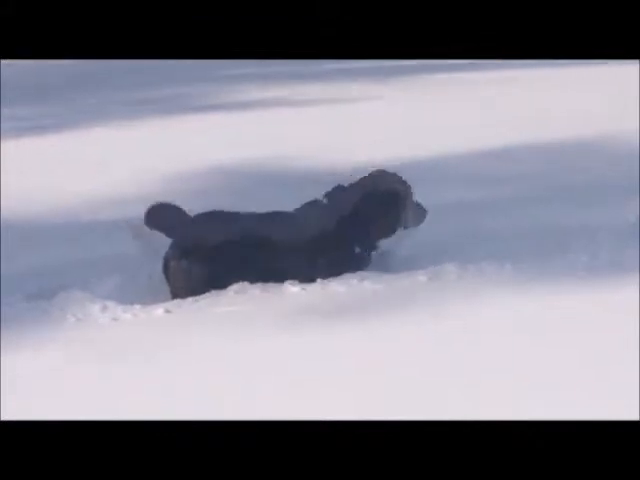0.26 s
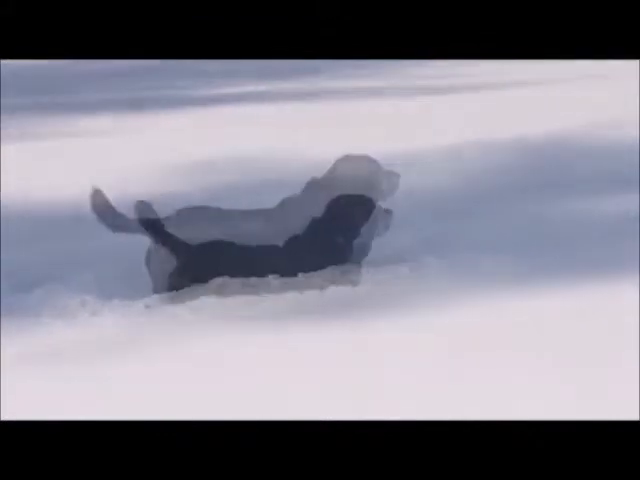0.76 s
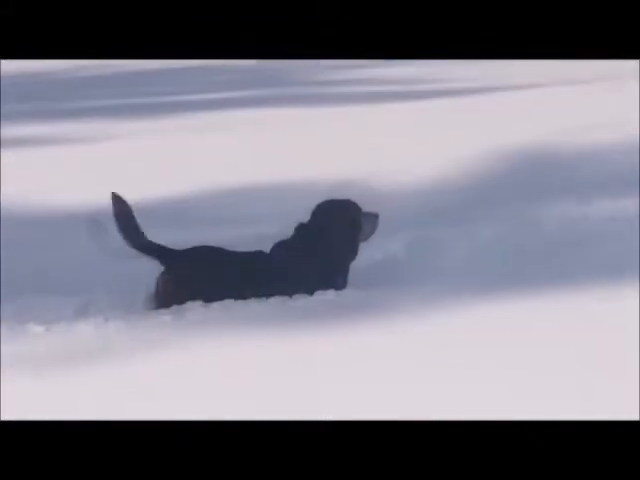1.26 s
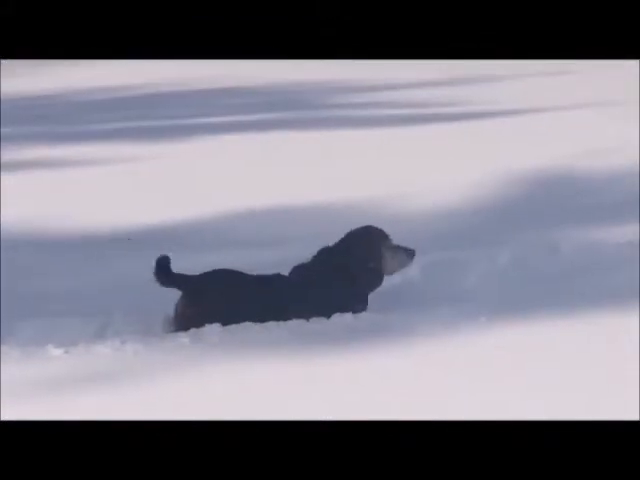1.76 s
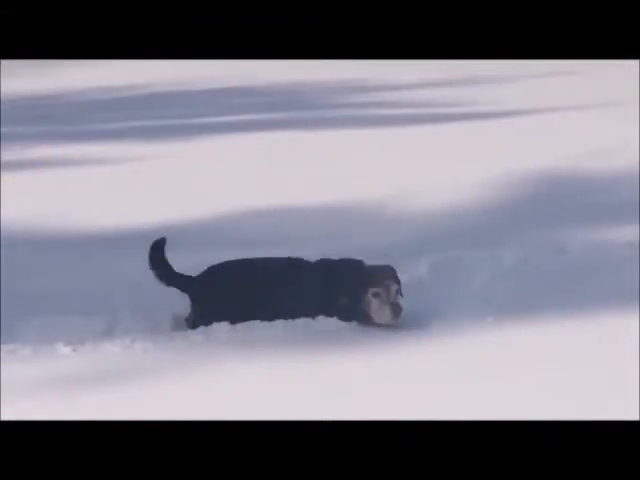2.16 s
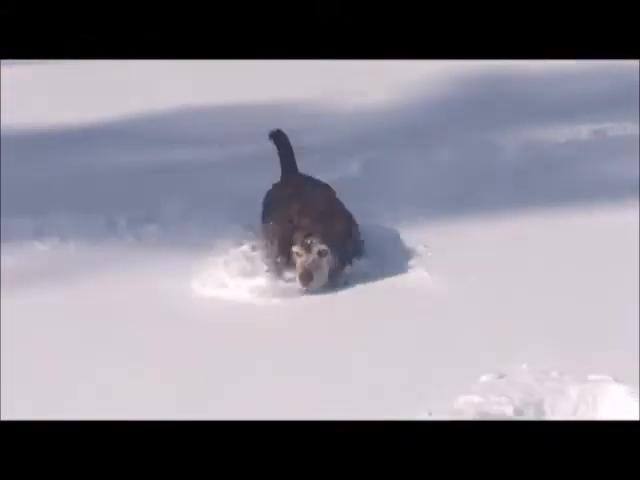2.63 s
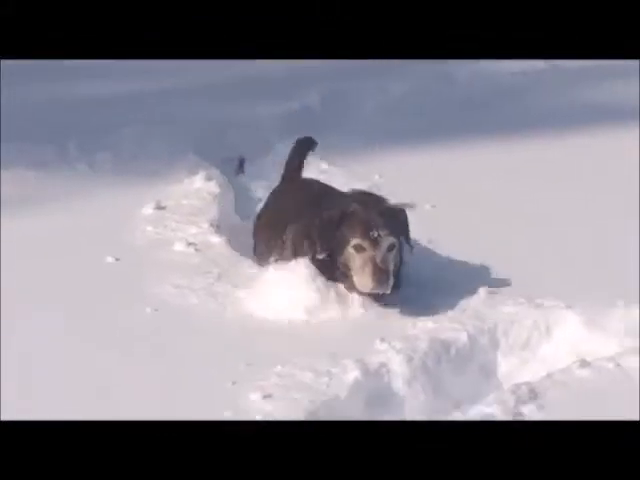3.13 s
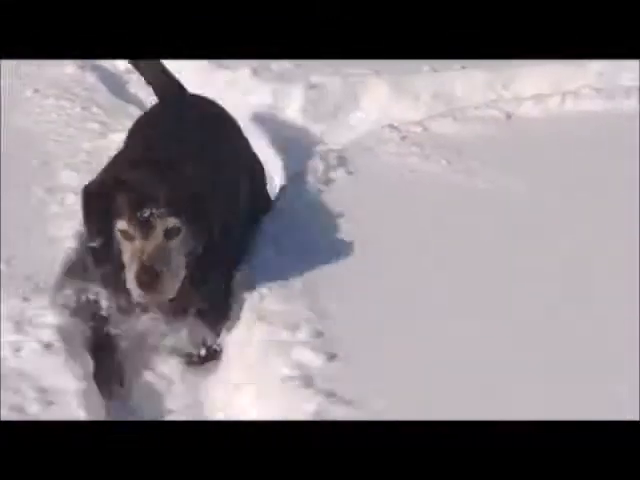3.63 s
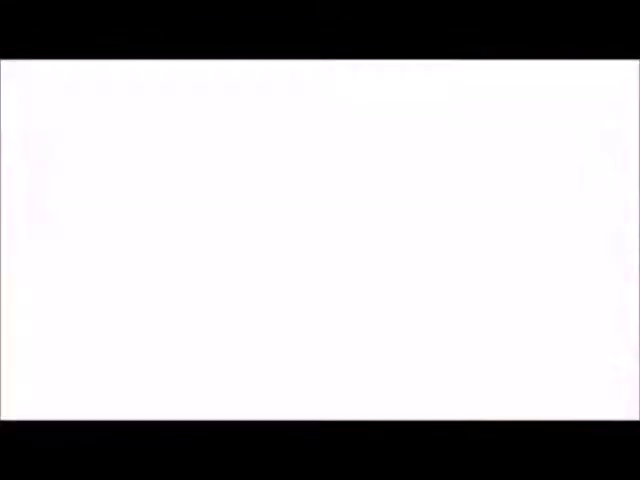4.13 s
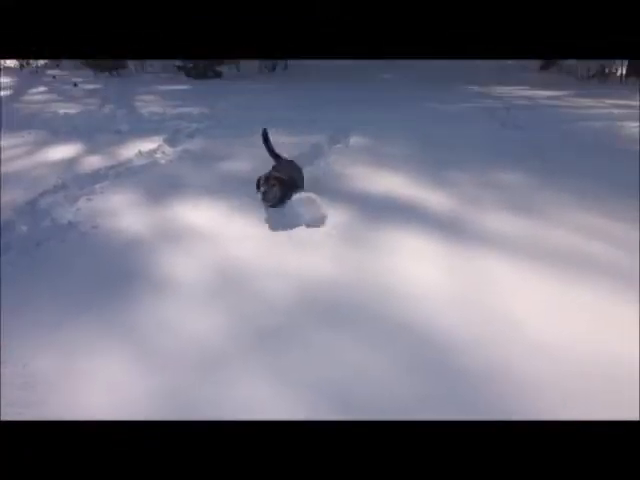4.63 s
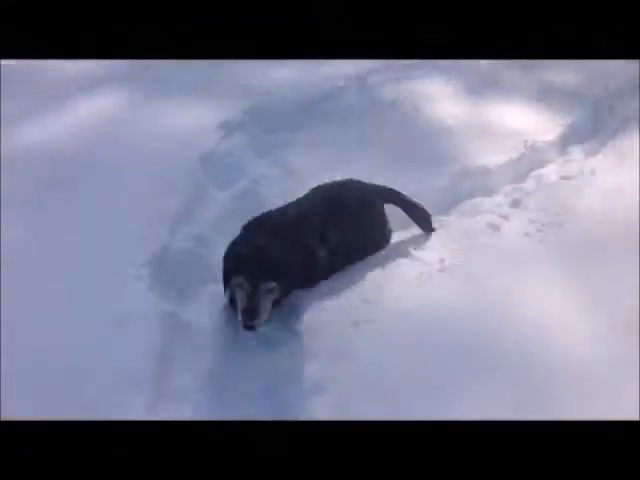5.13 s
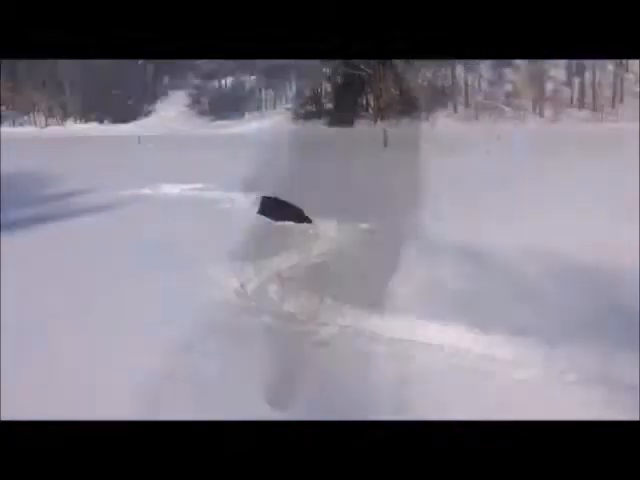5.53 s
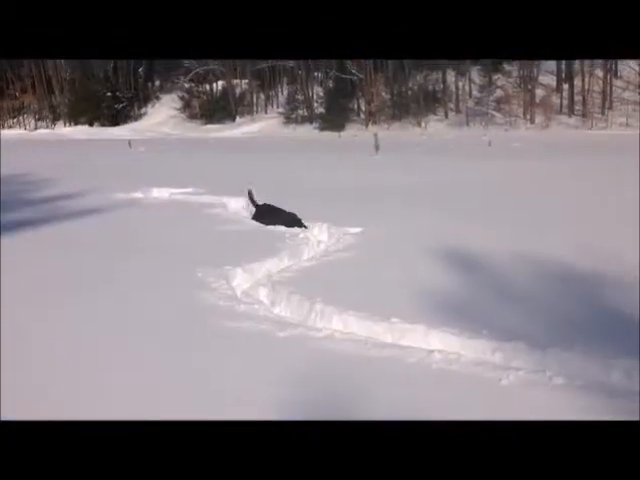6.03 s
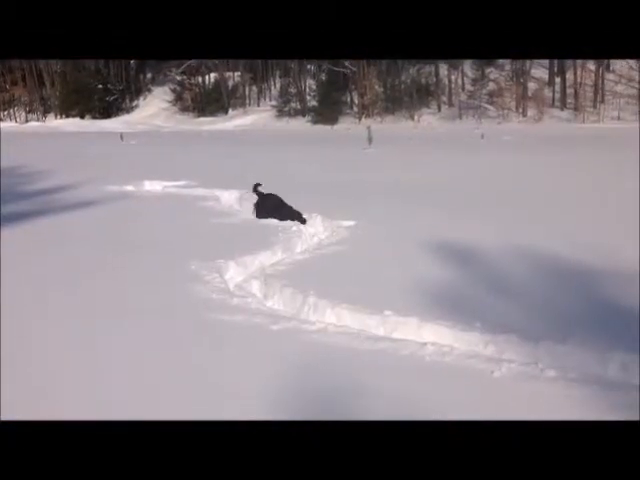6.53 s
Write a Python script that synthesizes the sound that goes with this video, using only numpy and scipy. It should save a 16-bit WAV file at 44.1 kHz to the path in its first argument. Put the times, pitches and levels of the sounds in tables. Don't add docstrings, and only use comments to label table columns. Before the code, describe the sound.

An open snowy field, dry and without echo, heard through a small hand-held camera microphone with low air rumble, steady hiss and a faint high buzz. At 0.25-0.4 s a paw crunches and squeaks in the crust with a sharp snap. Collar tags jingle lightly near 0.1 and 0.65 s, while a small bird gives faint falling chips from 0.5 to 1.06 s. Soft thuds and tiny ticks follow; the tags rattle again at 2.55-2.8 s. At 3.45-3.65 s the dog breaks hard through the crust, bright and crisp, then trickling. A very loud button click strikes at 4.10 s with a small release, then a near-silent gap until 4.25 s. Lighter crunches, knocks and thuds continue, with clicks at 5.06 and 5.64 s. From 5.7 s to about 6.8 s it is calm, with a faint, wavering, slowly rising machine whine far away.

```python
import sys
import numpy as np
from scipy import signal
from scipy.fft import rfft, irfft
from scipy.io import wavfile
from scipy.ndimage import uniform_filter1d

SR = 44100
rng = np.random.default_rng(int(sys.argv[2]) if len(sys.argv) > 2 else 0)


def magnitude_from_level(level_db):
    exponent = np.asarray(level_db, float) / 20
    return 10 ** exponent


def wav_out(sig):
    wavfile.write(sys.argv[1], SR, np.round(np.clip(np.atleast_2d(sig).T, -1, 1) * 32767).astype(np.int16))


N = 299424


def colour(x, points):
    hz, db = np.transpose(points)
    grid = np.linspace(1, SR / 2, 2049)
    cepstrum = irfft(np.interp(np.log(grid), np.log(hz), db) * np.log(10) / 20)
    cepstrum[1:2048] *= 2
    cepstrum[2049:] = 0
    response = irfft(np.exp(rfft(cepstrum)))[:2048]
    return signal.fftconvolve(x, response)[:N]


def unit(x):
    return x / np.sqrt(np.mean(x ** 2))


def band(x, hz, width):
    return signal.lfilter(*signal.iirpeak(hz, hz / width, fs=SR), x)


def walk(rate):
    hold = int(SR / rate)
    steps = np.repeat(rng.standard_normal(N // hold + 1), hold)
    return 1.3 * uniform_filter1d(uniform_filter1d(steps, hold), hold)[:N]


def add(out, s, piece):
    i = int(s * SR)
    out[i:i + len(piece)] += piece[:N - i]


def fade(rise, t60, seconds):
    t = np.arange(int(seconds * SR)) / SR
    return (1 - np.exp(-t / rise)) * magnitude_from_level(-60 * t / t60)


def grains(per_second, scatter_db):
    chance = rng.random((3, N))
    size = magnitude_from_level(-scatter_db * np.log(chance[1] + 1e-4)) * np.sign(chance[2] - .5)
    return (chance[0] < per_second / SR) * size


# frequency in Hz, level in dB per Hz.
SNOW = [(120, -61), (200, -25), (236, -16), (305, -6), (499, -22.5), (621, -13.5), (693, -9), (1580, -12),
        (3160, -1), (4730, -10.5), (7890, -27.5), (15800, -40)]


def crushed_snow():
    return unit(colour(grains(6500, 2.1) * magnitude_from_level(1.8 * walk(250)), SNOW))


# start in seconds, level in dB, length in seconds, brightness in dB per octave.
BREAKS = [(0.261, -50.5, 0.01, -4), (0.27, -41, 0.016, 3), (0.28, -49.5, 0.016, 1),
          (0.328, -49.5, 0.034, 5), (2.152, -56.5, 0.02, -2), (2.248, -69, 0.057, 8),
          (3.4555, -35, 0.0032, 10.5), (3.473, -38, 0.041, 3), (3.459, -36.5, 0.019, 4),
          (3.511, -42.5, 0.032, 4), (3.595, -37, 0.043, 4.5), (3.649, -51.5, 0.019, 2),
          (3.662, -60.5, 0.034, -5.5), (4.055, -58, 0.018, -2), (4.13, -48.5, 0.01, -1),
          (4.229, -46, 0.023, 5.5), (4.584, -62.5, 0.059, -2), (4.858, -65, 0.062, -5.5),
          (5.208, -64, 0.027, -1)]
# start in seconds, level in dB, length in seconds, brightness in dB per octave.
SINKS = [(0.236, -54, 0.041, 2.5), (0.286, -48.5, 0.051, 5.5), (0.352, -47, 0.021, 2.5),
         (1.38, -67.5, 0.069, -1), (3.419, -59, 0.035, -4), (3.444, -40.5, 0.014, -2),
         (3.535, -44.5, 0.024, 3.5), (3.567, -48, 0.035, 1.5), (3.629, -42.5, 0.02, 4),
         (3.731, -52.5, 0.03, 0), (3.867, -57, 0.018, 1), (4.361, -62, 0.028, 6.5),
         (4.491, -57.5, 0.019, 4), (4.705, -61.5, 0.02, 6), (4.84, -56, 0.029, 7.5),
         (4.923, -60, 0.017, -3), (4.954, -59.5, 0.056, 3.5), (5.333, -62, 0.061, 2),
         (5.578, -55.5, 0.045, 0), (6.203, -79.5, 0.17, 18.5)]
BREAK_PEAK, SINK_PEAK = 0.16, 0.55


def crunch(snow):
    out = np.zeros(N)
    for steps, peak in ((BREAKS, BREAK_PEAK), (SINKS, SINK_PEAK)):
        for s, db, length, tilt_db in steps:
            u = np.arange(int(length * SR)) / (length * SR)
            shape = np.sin(np.pi * u ** (np.log(.5) / np.log(peak))) ** .8
            burst = unit(snow[int(s * SR):][:len(u)]) * shape
            piece = np.r_[burst, np.zeros(200)]
            tilt = [(200, -3.9 * tilt_db), (3000, 0), (6000, tilt_db), (16000, 1.5 * tilt_db)]
            add(out, s, magnitude_from_level(db) * colour(piece, tilt)[:len(piece)])
    return out


# start in seconds, level in dB, length in seconds, centre in Hz.
SQUEAKS = [(0.262, -50, .008, 3610), (.2705, -44.5, 0.008, 2850), (0.279, -47, 0.013, 3230),
           (0.327, -50, 0.021, 3080), (.33, -55, .018, 4700), (0.675, -50, 0.015, 2970),
           (2.23, -72, .07, 6660), (2.564, -58, 0.016, 2950), (2.692, -54, 0.018, 2873),
           (3.197, -73, 0.16, 7050), (3.4755, -38, 0.009, 3300), (3.47, -66, .03, 14500),
           (3.535, -70, .022, 14800), (3.595, -48, .026, 5200), (3.605, -48, .025, 4130),
           (3.512, -43, 0.012, 3250), (3.54, -45, .008, 3050), (3.594, -37.5, 0.015, 3130),
           (3.632, -46, 0.014, 3040), (4.106, -47.5, .006, 8170), (4.1035, -46, .003, 10000),
           (3.596, -66, .028, 14800), (5.062, -53, .014, 7000), (5.065, -49, .008, 3200),
           (4.985, -65, .02, 4600), (4.128, -48, 0.0066, 2750), (4.245, -58, 0.015, 4150),
           (4.84, -53, .023, 3860), (4.975, -79, .028, 3550), (5.21, -64, 0.011, 3640),
           (5.59, -58, .024, 4820), (5.595, -67, 0.019, 3230)]


def squeak(snow):
    out = np.zeros(N)
    lead = 400
    for s, db, length, hz in SQUEAKS:
        width = 0.14 * hz
        piece = snow[int(s * SR) - lead:][:lead + int(length * SR)]
        ring = band(band(piece, hz, width), hz, 2 * width)[lead:]
        swell = np.sin(np.pi * np.arange(len(ring)) / len(ring)) ** 1.1
        add(out, s, magnitude_from_level(db) * unit(ring) * swell)
    return out


# time in seconds, peak in dB, centre in Hz.
TICKS = [(0.3845, -21, 3030), (0.617, -39, 2710), (1.3803, -49, 2830), (1.4935, -44, 4700),
         (1.4935, -50, 2400), (1.4935, -49, 7500), (2.2675, -53, 2900), (.617, -45, 6300),
         (.617, -47, 4500), (.617, -49, 1300), (.2588, -40, 3300), (.2742, -33, 2800), (.3306, -39, 3070),
         (.3576, -39, 4500), (.3616, -41, 2850), (4.8477, -44, 3750), (1.664, -55, 7000),
         (1.664, -56, 2200), (3.702, -50, 2900), (3.727, -50, 3200), (3.847, -51, 2900),
         (3.5137, -36, 3270), (5.3945, -51, 2860), (5.5347, -52, 6000), (5.2458, -53, 2970),
         (5.2089, -48, 3700), (4.9277, -38, 3000), (5.0232, -48, 2600), (5.2455, -52, 6000),
         (5.417, -50, 3800), (3.5815, -46, 2900), (3.5974, -27, 3100), (3.5974, -34, 5600),
         (3.4772, -29, 3400), (3.5396, -37, 3040), (5.3945, -48, 6000), (1.6374, -56, 3370),
         (1.8694, -55, 2510), (1.9644, -56, 3670), (2.1465, -40, 3010), (5.1055, -50, 6000),
         (2.6965, -48, 2900), (1.928, -57, 3600), (.6503, -50, 3400), (2.2059, -52, 2810),
         (3.1892, -50, 3130), (3.2111, -46, 3290), (3.269, -44, 3260), (3.4186, -44, 2930),
         (3.4456, -22, 2920), (3.4535, -19, 3110), (3.4584, -24, 3430), (3.7683, -32, 3300),
         (3.8427, -50, 2790), (3.8696, -48, 2900), (3.91, -46, 3190), (3.9584, -48, 2870),
         (4.0068, -33, 3150), (4.4109, -50, 3040), (4.5895, -46, 3130), (5.4914, -44, 3020),
         (5.5653, -42, 2680)]
# time in seconds, peak in dB, centre in Hz.
KNOCKS = [(0.91, -45, 404), (1.963, -47.5, 736), (2.146, -47, 732), (2.205, -43.5, 570),
          (2.795, -50.5, 374), (2.857, -50, 423), (2.938, -52.5, 703), (3.19, -47, 1100),
          (3.269, -48.5, 800), (3.211, -44, 348), (3.445, -33, 775), (3.4531, -24.5, 580),
          (3.458, -33, 1150), (3.727, -50, 500), (4.0067, -39.5, 895), (1.664, -51.5, 600),
          (2.035, -52, 400), (2.269, -52, 500), (5.466, -48, 520), (5.576, -48, 800), (4.271, -41.5, 555),
          (4.415, -42.5, 611), (4.451, -44.5, 353), (4.468, -55, 366), (4.592, -48, 421),
          (4.67, -44.5, 690), (4.694, -44.5, 412), (4.853, -45, 1200), (4.879, -41.5, 600),
          (4.915, -41, 1000), (4.92, -38, 580), (4.924, -41, 800), (4.9273, -53, 900), (4.982, -49, 900),
          (5.001, -41, 895), (5.006, -41, 500), (5.015, -45, 1200), (5.074, -37, 1400), (5.023, -38.5, 759),
          (5.031, -33.5, 377), (5.106, -35, 1210), (5.1945, -47, 544), (5.204, -45, 1500),
          (5.406, -41.5, 536), (5.445, -50, 700), (5.537, -38.5, 519)]


def snaps():
    out, click = np.zeros(N), np.r_[1., np.zeros(1500)]
    soft = signal.lfilter(*signal.butter(6, 6800, fs=SR), click)
    for s, db, hz in TICKS:
        snap = band(band(soft, hz, 0.15 * hz) + 0.12 * soft, hz, 1.7 * hz)
        add(out, s + 0.0009, magnitude_from_level(db - 3.5) * snap / snap.max())
    for s, db, hz in KNOCKS:
        knock = band(band(soft, hz, 0.95 * hz), hz, 1.8 * hz)
        add(out, s + 0.001036, magnitude_from_level(db - 1.0) * knock / knock.max())
    return out


# time in seconds, peak in dB, centre in Hz.
THUDS = [(.103, -43, 310), (.313, -39.5, 295), (.536, -44, 363), (.628, -41, 227), (0.735, -41.5, 252),
         (.908, -42.5, 302), (1.0, -44.5, 207), (1.429, -42, 217), (2.514, -49.5, 236.7),
         (2.855, -40.5, 300), (3.174, -33.5, 430), (3.206, -43, 347), (3.268, -42.5, 284),
         (3.372, -42, 283), (3.45, -32.5, 252), (4.412, -39.5, 547), (4.571, -45, 393), (4.667, -40.5, 258),
         (4.916, -38, 585), (5.028, -43, 240), (5.074, -31, 242), (5.128, -48, 330), (5.159, -47.5, 462),
         (5.46, -43, 546), (5.517, -40, 470), (5.538, -48, 401), (5.647, -31, 510), (5.668, -45, 204),
         (6.253, -48.5, 317)]


def thuds():
    out = np.zeros(N)
    length = 4000
    for s, db, hz in THUDS:
        t60 = 0.046 * (300 / hz) ** 0.32
        puff = unit(band(rng.standard_normal(length), hz, 0.374 * hz))
        puff = puff * fade(0.0024, t60, length / SR)
        add(out, s, magnitude_from_level(db - 3.0) * band(puff, hz, 1.13 * hz))
    return out


# time in seconds, peak in dB, t60 in seconds, level of upper rings in dB.
RATTLES = [(0.1057, -54, 0.89, 2.5), (0.1594, -71, 0.45, 9), (0.1994, -79, 0.4, 9),
           (0.6503, -47, 0.42, 4.5), (0.6759, -57, 0.24, -3), (0.7094, -61, 0.3, -4),
           (0.7694, -63, 0.25, 0), (1.399, -55, 0.19, -7), (1.4202, -78, 0.27, -7), (2.555, -45.5, 0.4, -2),
           (2.5731, -59, 0.35, 4), (2.6842, -49.5, 0.41, -0.5), (2.6978, -52, 0.32, 2),
           (2.744, -69, 0.35, 7), (2.7794, -65.5, 0.59, 5), (2.8094, -73, 0.63, 6)]
# centre in Hz, width in Hz, level in dB.
TAG_RINGS = [(1910, 190, -16), (2865, 180, 3.5), (3500, 210, -1), (3800, 220, -6.5), (4420, 230, -5),
             (4770, 90, -10), (6680, 250, -15)]
# time in seconds, lower ring in Hz, upper ring in Hz.
SWING = [(0, 2930, 3510), (.64, 2930, 3440), (.69, 3000, 3420), (.73, 2930, 3470), (.8, 3000, 3400),
         (1.4, 2860, 3500), (1.425, 3250, 3700), (2.55, 2920, 3370), (2.579, 2955, 3460),
         (2.62, 2955, 3520), (2.68, 2940, 3530), (2.705, 2900, 3580), (2.739, 2910, 3730),
         (2.79, 2810, 3700), (2.83, 2790, 3680), (2.92, 2800, 3570)]


def slide(x, shift_hz):
    return np.real(signal.hilbert(x) * np.exp(2j * np.pi * np.cumsum(shift_hz) / SR))


def tags():
    low, high = np.zeros(N), np.zeros(N)
    for s, db, t60, upper_db in RATTLES:
        add(low, s, magnitude_from_level(db - 8.0) * fade(0.0034, t60, 0.58))
        add(high, s, magnitude_from_level(db - 12.5 + upper_db) * fade(0.0035, t60, 0.7))
    knocks = grains(4000, 1.3) * magnitude_from_level(1.4 * walk(150))
    rings = [magnitude_from_level(db) * unit(band(band(knocks, hz, w), hz, 3.0 * w)) for hz, w, db in TAG_RINGS]
    s, lower_hz, upper_hz = np.transpose(SWING)
    for k, hz in ((1, lower_hz), (2, upper_hz)):
        rings[k] = slide(rings[k], np.interp(np.arange(N) / SR, s, hz) - TAG_RINGS[k][0])
    return low * sum(rings[:2]) + high * sum(rings[2:])


# time in seconds, snap in dB, swing in dB, swing in Hz, swing t60 in seconds.
BUTTON = [
    (4.10385, .3, -1.9, 281, .0102),
    (5.06039, -4.6, -10.3, 229, .0148),
    (5.63626, -1.1, -7.8, 263, .011),
]
# sag in dB, sag in seconds, push in seconds, lean (under 1 is early), share of buzz.
THUMB = [
    (-16.5, .005, .00092, .76, .3),
    (-19.3, .0031, .00155, 1.24, .1),
    (-18.3, .0029, .00135, 1.67, .24),
]
# time in seconds, level in dB.
RELEASE = [
    (4.1453, -20.5),
    (4.146, -25),
    (5.1116, -22.5),
    (5.685, -25.5),
]


def dome(t, db):
    snap_s = .000035
    return magnitude_from_level(db) * (np.e * t / snap_s / 2) ** 2 * np.exp(-t / snap_s)


def button():
    out, t = np.zeros(N), np.arange(int(.05 * SR)) / SR
    for (s, snap_db, swing_db, hz, t60), (sag_db, sag, push, lean, buzz) in zip(BUTTON, THUMB):
        sagging = t[t < sag + .0001]
        add(out, s - sag, -magnitude_from_level(sag_db) * np.sin(np.pi / 2 * sagging / sag) ** 2)
        add(out, s, dome(t, snap_db))
        pushing = t[t < push]
        hump = np.sin(np.pi * (pushing / push) ** lean) ** .7
        add(out, s, magnitude_from_level(-12.2) * hump * (1 + buzz * np.sin(2 * np.pi * 2500 * pushing)))
        add(out, s + push, -magnitude_from_level(swing_db) * np.sin(2 * np.pi * hz * t) * magnitude_from_level(-60 * t / t60))
    add(out, 4.10338, dome(t, -13) + magnitude_from_level(-21) * (t < .0005))
    for s, db in RELEASE:
        add(out, s, dome(t, db))
    return out


# start in seconds, end in seconds, jolt in dB, jolt t60 in seconds, creak in dB.
HOLD = [
    (4.103, 4.154, -25.5, 0.04, -52),
    (5.063, 5.115, -38, 0.03, -47),
    (5.635, 5.688, -35.5, 0.053, -49.5),
]
# frequency in Hz, level in dB per Hz.
CREAK = [(35, -40.5), (60, -9), (211, 0), (1010, -16.5), (1190, -20), (3160, -21.5), (6990, -33.5),
         (13700, -40.5), (15800, -48)]


def creak():
    out = np.zeros(N)
    rubbing = unit(colour(grains(2700, 2.0) * magnitude_from_level(1.6 * walk(150)), CREAK))
    for s, end, jolt_db, t60, creak_db in HOLD:
        jolt = magnitude_from_level(jolt_db) * fade(0.00073, t60, end - s)
        piece = rubbing[int(s * SR):][:len(jolt)]
        add(out, s, magnitude_from_level(creak_db) * piece + jolt * (3.0 * band(piece, 5500, 6000) + .15 * piece))
    return out


# middle in seconds, signed size,
# length in seconds.
HUMPS = [
    (3.459, .001, .014),
    (4.1055, .012, .006),
    (4.1097, -.01, .004),
    (4.0985, -.005, .005),
    (5.061, .013, .003),
    (5.637, .015, .003),
    (5.6392, -.005, .003),
]
# time in seconds, level in dB, lower limit in Hz.
EDGES = [
    (4.10392, -39, 13000),
    (5.06046, -36, 12500),
    (5.63633, -35, 12500),
    (5.685, -38, 7000),
]


def humps():
    out = np.zeros(N)
    for s, size, length in HUMPS:
        add(out, s - length / 2, size * np.hanning(int(length * SR)) ** .7)
    for s, db, hz in EDGES:
        impulse = np.arange(60) == 0
        add(out, s, magnitude_from_level(db) * signal.lfilter(*signal.butter(2, hz, "high", fs=SR), impulse))
    return out


# middle in seconds, level in dB, middle in Hz, length in seconds.
CHIPS = [
    (0.521, -54.5, 2780, .014),
    (0.62, -50, 2970, 0.0055),
    (0.748, -50, 2600, 0.0078),
    (.835, -44.5, 2890, 0.0083),
    (.845, -49, 2880, 0.0052),
    (0.925, -43.5, 2825, .017),
    (0.94, -49.5, 2850, 0.0076),
    (1.054, -40, 2940, 0.0088),
    (1.063, -56, 3180, .0094),
]


def bird():
    out = np.zeros(N)
    fall_hz, bend = 1050, 0.34
    for s, db, hz, length in CHIPS:
        t = np.arange(-length, length, 1 / SR)
        fall = fall_hz * (t ** 2 / length / 2 + bend * t ** 3 / length ** 2 / 3)
        phase = 2 * np.pi * (hz * t - fall)
        swell = np.exp(-np.where(t < 0, 9.0, 3.0) * (t / length) ** 2)
        add(out, s - length, magnitude_from_level(db) * swell * (np.sin(phase) + 0.073 * np.sin(2 * phase)))
    return out


# time in seconds, level in dB.
WHINE = [(5.72, -81), (5.85, -73), (5.99, -68), (6.05, -76), (6.14, -67), (6.2, -90), (6.27, -72),
         (6.42, -69), (6.55, -70), (6.62, -78), (6.74, -70), (6.79, -73)]


def whine():
    s, db = np.transpose(WHINE)
    t = np.arange(N) / SR
    hz = 623 + 53 * (t - s[0]) + 3.1 * walk(25)
    phase = 2 * np.pi * np.cumsum(hz) / SR
    lower = .55 * (t > 6.24) * (t < 6.56) * np.sin(phase / 2)
    return (np.sin(phase) + lower) * magnitude_from_level(np.interp(t, s, db, left=-140) + .2 + 1.2 * walk(30))


# frequency in Hz, level in dB per Hz.
RUMBLE = [(15, -51), (25, -30.5), (81, -16), (230, 3), (357, -1.5), (703, -5), (860, -9), (1180, -15),
          (1520, -18), (2000, -16), (2600, -30), (4400, -120)]
# frequency in Hz, level in dB per Hz.
HISS = [(530, -33.5), (900, -0.5), (1370, -2.5), (1490, -1.5), (3790, -6), (5120, -4.5), (6660, -6.5),
        (9320, -1), (14200, -10.5), (15800, -11)]
# start in seconds, hiss in dB, wind at its start in dB, wind at its end in dB, snow in dB.
SHOTS = [
    (0, 4.5, -62.5, -64, 2),
    (1.45, 3, -65, -66, 0.5),
    (4.199, 3.5, -66, -59.5, -0.5),
    (5.687, 1.5, -71.5, -71, -15.5),
]
# time in seconds, level in dB.
STIR = [(0, -1.5), (.7, 1), (1.25, -3.5), (1.34, 0), (1.45, -10.5), (1.65, -5.5), (2.4, -0.5), (2.6, 1),
        (2.9, -5.5), (3.2, 2.5), (3.4, -1.5), (3.65, 3), (4.09, 1), (4.34, 1), (4.72, -2.5), (4.9, 8),
        (5.12, 1), (5.62, 6)]


def air():
    t = np.arange(N) / SR
    start, hiss_db, first_db, last_db, snow_db = np.transpose(SHOTS)
    shot = np.searchsorted(start, t, "right") - 1
    gone = (t - start[shot]) / np.diff(np.r_[start, N / SR])[shot]
    stir_db = np.interp(t, *np.transpose(STIR))
    wind_db = first_db[shot] + gone * (last_db - first_db)[shot] + 0.3 * stir_db
    puffs = grains(700, 2.2) + .3 * rng.standard_normal(N)
    rumble = unit(colour(puffs * magnitude_from_level(2.0 * walk(25)), RUMBLE))
    settle = unit(colour(grains(6000, 0.93) * magnitude_from_level(1.1 * walk(30)), SNOW))
    hiss = unit(colour(rng.standard_normal(N) * magnitude_from_level(1.5 * walk(33)), HISS))
    settle = settle * magnitude_from_level(-68.5 + stir_db + snow_db[shot])
    return rumble * magnitude_from_level(wind_db) + settle + hiss * magnitude_from_level(-70 + hiss_db[shot])


# start in seconds, end in seconds, peak in dB.
SENSOR = [
    (.0034, 1.1, -77),
    (.407, 1.45, -78),
    (1.4579, 4.14, -79),
    (4.2486, 5.0, -76),
    (5.0039, 5.68, -78),
    (5.6915, 6.79, -73.5),
]


def sensor():
    t, gate = np.arange(N) / SR, np.zeros(N)
    field_hz, puff_s, hiss_hz, width_hz = 119.88, .0004, 14100, 3000
    for s, end, db in SENSOR:
        off = (((t - s) * field_hz + .5) % 1 - .5) / field_hz
        gate += magnitude_from_level(db + 3) * np.exp(-.5 * (off / puff_s) ** 2) * (t > s - .002) * (t < end)
    return gate * unit(band(band(rng.standard_normal(N), hiss_hz, width_hz), hiss_hz, 2 * width_hz))


def shimmer(x):
    top = signal.sosfiltfilt(signal.butter(2, 11030, "high", fs=SR, output="sos"), x)
    return x + top * (magnitude_from_level(1.3 * walk(25) - 0.9) - 1)


def scene():
    snow = crushed_snow()
    dog = crunch(snow) + squeak(snow) + snaps() + thuds() + tags()
    field = shimmer(dog + bird() + whine() + air())
    field = signal.sosfilt(signal.butter(1, 45, "high", fs=SR, output="sos"), field)
    case = button() + creak()
    case = signal.sosfiltfilt(signal.butter(1, [95, 8200], "band", fs=SR, output="sos"), case)
    case = signal.sosfiltfilt(signal.butter(2, 12000, fs=SR, output="sos"), case)
    return (field + case + humps() + sensor())[None]


# middle in seconds, lower limit in Hz.
THINNED = [(.157, 4500), (.25, 5000), (.31, 5300), (.333, 5500), (1.345, 1500), (1.405, 1500), (1.45, 1200),
           (1.692, 2000), (1.71, 5500), (1.775, 1200), (1.98, 4300), (2.01, 1200), (2.072, 3300),
           (2.11, 900), (2.162, 5500), (2.514, 900), (2.716, 5000), (2.93, 900), (3.094, 900), (3.141, 900),
           (3.177, 1200), (3.31, 4000), (3.69, 4500), (3.825, 4000), (4.316, 3000), (4.572, 1500),
           (4.627, 900), (4.766, 1200), (4.885, 5000), (5.167, 3200), (5.51, 5000), (6.313, 900)]
# middle in seconds, lower limit in Hz, upper limit in Hz.
EMPTIED = [
    (.303, 7300, 16000),
    (.311, 7400, 16000),
    (.32, 7800, 16000),
    (.332, 8100, 16000),
    (.318, 950, 1600),
    (3.606, 7300, 14200),
    (3.61, 7300, 14200),
    (3.611, 0, 450),
    (5.097, 7000, 16000),
    (5.518, 7400, 16000),
]


def thin(x):
    size = 1536
    out, window, hz = x.copy(), np.hanning(size) ** .5, np.arange(size // 2 + 1) * SR / size
    thinned = [(s, from_hz, 16000, .14) for s, from_hz in THINNED]
    emptied = [(*row, .006) for row in EMPTIED]
    for s, from_hz, to_hz, share in thinned + emptied:
        i = int(s * SR) - size // 2
        lines = rfft(out[i:i + size] * window)
        strength = uniform_filter1d(abs(lines), size=3) / uniform_filter1d(abs(lines), size=60)
        weak = (hz > from_hz) & (hz < to_hz) & (strength < np.quantile(strength, 1 - share))
        out[i:i + size] -= .94 * window * irfft(lines * weak)
    return out


def top_cut(x):
    return signal.sosfilt(signal.butter(12, 16620, fs=SR, output="sos"), x)


# start in seconds, end in seconds.
GAP_S = (4.149, 4.2455)


def record(dry):
    t = np.arange(N) / SR
    inside = (t > GAP_S[0]) & (t < GAP_S[1])
    gate = np.where(inside, magnitude_from_level(-18.0 - 340 * (t - GAP_S[0])), 1)
    gated = dry * uniform_filter1d(gate, size=40)
    cut = signal.sosfiltfilt(signal.ellip(8, .1, 25, 15800, fs=SR, output="sos"), gated)
    mix = thin(cut[0])[None]
    return top_cut(mix)


dry = scene()
out = record(dry)
wav_out(out)
```